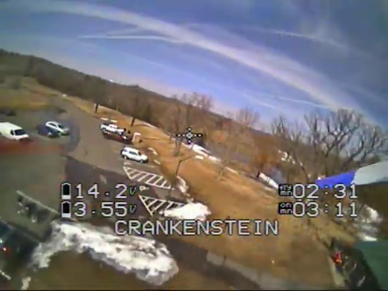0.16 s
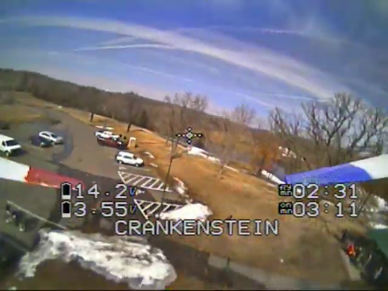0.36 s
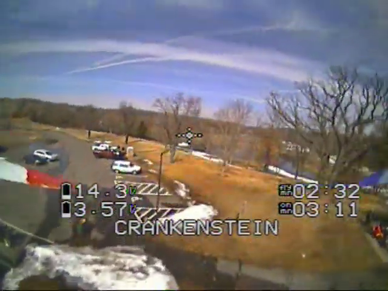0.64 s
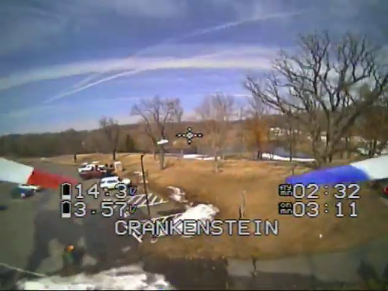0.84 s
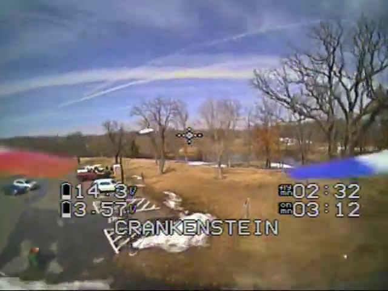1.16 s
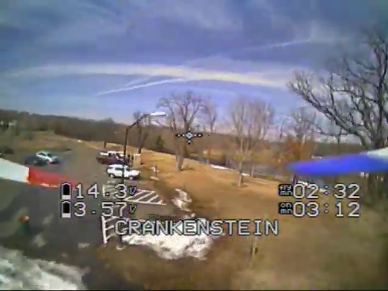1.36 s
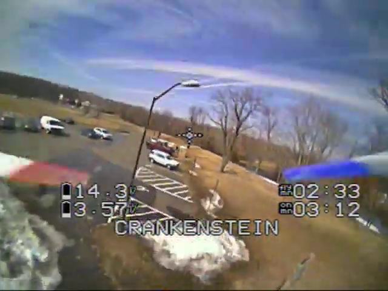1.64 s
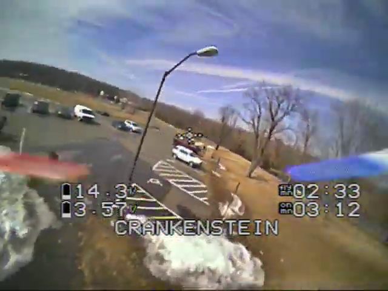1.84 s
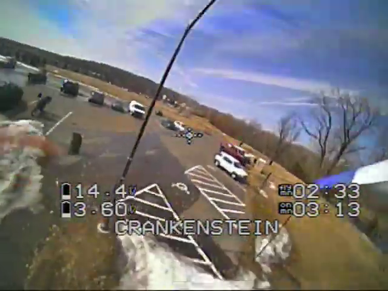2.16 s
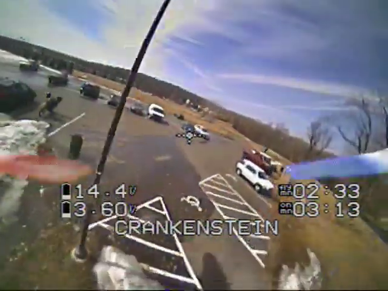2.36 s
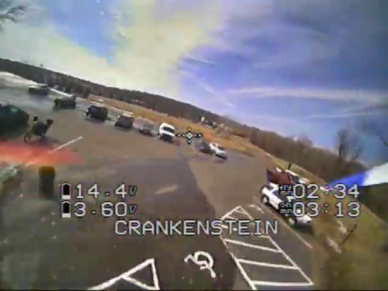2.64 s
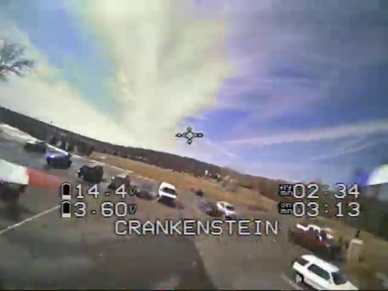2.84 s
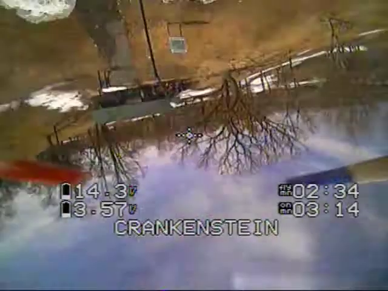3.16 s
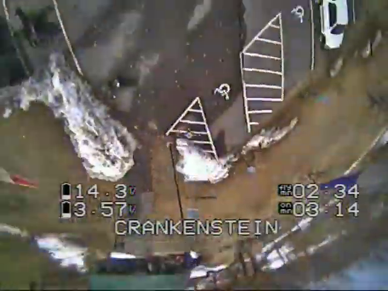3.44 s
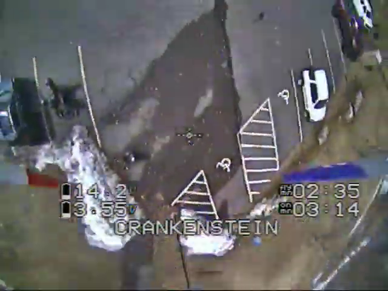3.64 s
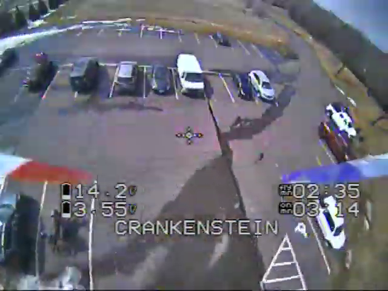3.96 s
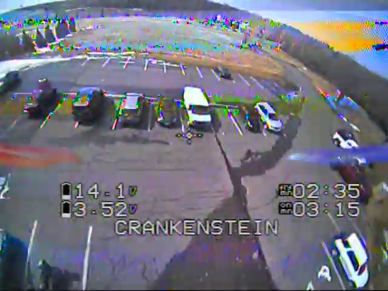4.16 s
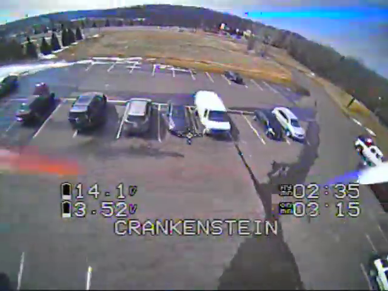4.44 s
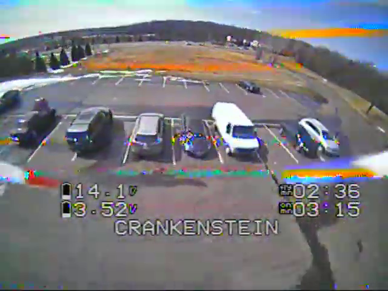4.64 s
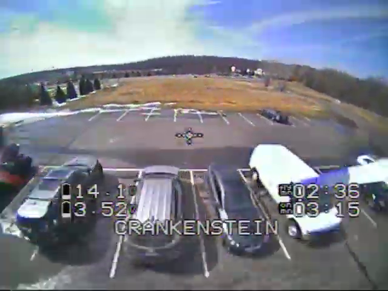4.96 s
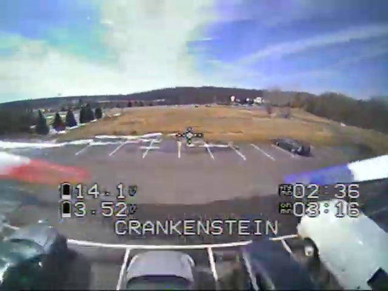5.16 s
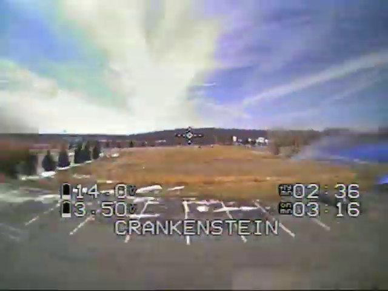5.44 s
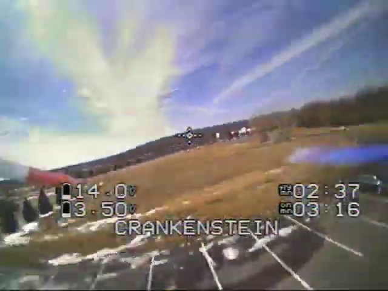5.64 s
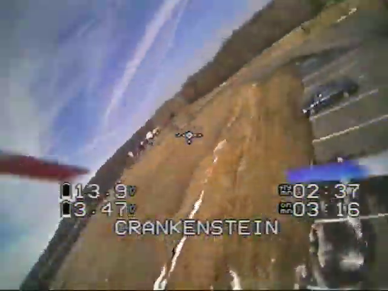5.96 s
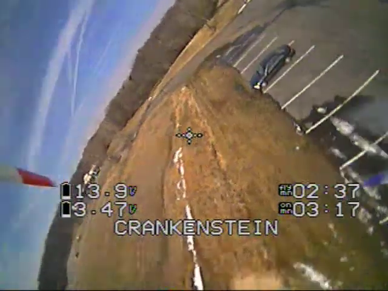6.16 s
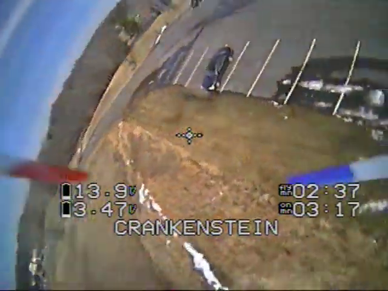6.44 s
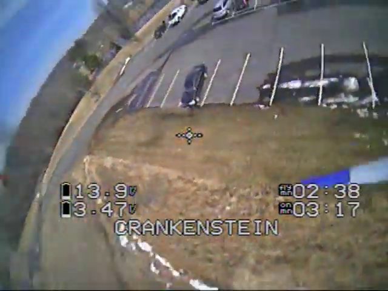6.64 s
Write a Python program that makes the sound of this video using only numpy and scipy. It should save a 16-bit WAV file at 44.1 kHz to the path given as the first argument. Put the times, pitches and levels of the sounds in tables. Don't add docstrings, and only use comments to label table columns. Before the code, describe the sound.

A harsh low video buzz runs under hiss and gusty thumps until a small drone dives in overloaded roar, then winds down to faint whines.

```python
import sys
import numpy as np
from scipy import signal
from scipy.fft import rfft, irfft, next_fast_len
from scipy.io import wavfile

SR = 44100
rng = np.random.default_rng(int(sys.argv[2]) if len(sys.argv) > 2 else 0)


def gain_from_db(level_db):
    decades = np.asarray(level_db, float) / 20
    return 10 ** decades


def inscribe(sig):
    pcm = np.round(np.clip(np.atleast_2d(sig).T, -1, 1) * 32767)
    wavfile.write(sys.argv[1], SR, pcm.astype(np.int16))


N = 300321

FIELD_HZ = 49.951
TEXT_TOP_MS, TEXT_PITCH_MS, TEXT_HEIGHT_MS, TEXT_END_MS = 2.82, 1.163, 0.9, 6.08
BLANK_START_MS, BLANK_END_MS = 9.63, 11.16
PATCH_START_MS, PATCH_END_MS, BAND_START_MS = 19.4, 0.33, 1.2

# time in seconds, ground below the text,
# foreground before blanking, sky after blanking, glare at the field edge (all full scale units).
VIEW_STEPS = [(0.0, .2, .1, .17, .3), (.27, .3, .14, .2, .33), (.65, .52, .11, .08, .1),
              (1.08, .3, .11, .19, .2), (1.62, .49, .16, .09, .1), (1.95, .35, .17, .13, .0),
              (2.43, .18, .24, .2, .14), (2.97, .07, .15, .15, .15), (3.24, .1, .07, .41, .04),
              (3.55, .23, .2, .41, .02), (4.15, .0, .45, .5, .0), (4.59, .36, .0, .13, .0),
              (4.86, .36, .14, .24, .2), (5.13, -.1, .2, .24, .14), (5.45, .08, .1, .13, .15),
              (6.15, .31, .21, .19, .02), (6.5, .14, .12, .28, .0), (6.81, .11, .06, .35, -.06)]
# time in seconds, share repeating from field to field (0-1),
# excess of the busy lower picture in dB.
PICTURE_TEXTURE = [(0, 0.5, 9.5), (1.4, 0.7, 10), (2.9, 0, 4.5), (3.2, 0.3, 5), (4, 0.2, 1.5), (5, 0.4, 2),
                   (6, 0.1, -1), (6.81, 0.8, -18.5)]
# start in seconds, end in seconds, multiple of the field rate, level in dB rms.
GROUND_STRIPES = [
    (0, .5, 14, -31.5),
    (.75, 1.198, 10, -30.5),
    (1.649, 1.9, 10, -34.5),
    (3.5, 3.802, 12, -32),
    (5.93, 6.215, 7, -25),
    (6.42, 7.095, 7, -21.5),
]
# time in seconds, pitch in Hz, level in dB rms.
ROTOR_TONES = [
    [(4.0, 172, -20), (4.04, 185.1, -14), (4.255, 212, -6.5), (4.39, 246.1, -6.5), (4.555, 393, -7),
     (4.69, 468, -12.5), (4.8, 491, -16), (4.91, 505, -20.5), (4.98, 505, -28.5)],
    [(4.98, 505, -28.5), (5.12, 355.6, -24.5), (5.26, 247.7, -31), (5.42, 234.4, -29)],
]
# time in seconds, pitch in Hz, level in dB rms.
MOTOR_WHINES = [
    [(4.362, 690, -14), (4.41, 1027, -22), (4.45, 1185, -21), (4.5, 1170, -25), (4.58, 1040, -27),
     (4.65, 1040, -23), (4.88, 1000, -33), (5.1, 880, -29), (5.25, 1048, -35)],
    [(5.95, 600, -36), (6.08, 585, -26), (6.19, 595, -28), (6.28, 660, -25), (6.55, 668, -28),
     (6.72, 690, -41)],
]
# start in seconds, length in seconds, start pitch in Hz,
# end pitch in Hz, peak level in dB rms.
MOTOR_BLIPS = [
    (3.07, .08, 1390, 1347, -25.5),
    (3.091, .06, 1190, 1222, -25.5),
    (3.09, .06, 710, 660, -22.5),
    (4.52, .11, 1472, 1405, -24),
    (5.269, .22, 1204, 1262, -26.5),
    (5.56, .14, 940, 880, -30),
    (4.56, .56, 118, 99.9, -16),
]
# time in seconds, airspeed as buffeting in dB, rotor load as wash in dB.
FLIGHT_PATH = [(0, -25, -26), (.55, -25, -23.5), (.85, -32.5, -27), (1.55, -23, -25), (1.9, -27.5, -28),
               (2.25, -24, -24), (2.5, -28, -28), (3.0, -29, -28.5), (3.3, -27, -22.5), (3.9, -21, -23.5),
               (4.0, -7, -18.5), (4.12, -10, -20), (4.3, -5, -18), (4.47, -6.5, -13.5), (4.77, -12, -16),
               (5.1, -24.5, -22), (6.4, -27.5, -22.5), (6.81, -27, -27.5)]
# time in seconds, peak in dB, pitch in Hz, width in ms.
GUST_KNOCKS = [(0.128, -14, 222, 5.9), (0.379, -15, 211, 8.2), (0.579, -6, 124, 9.4),
               (0.634, -14, 214.4, 6.4), (0.663, -15.5, 155.7, 3.9), (1.96, -14, 249.4, 6.3),
               (2.208, -15.5, 208.5, 8.3), (2.348, -17.5, 257.6, 13), (3.118, -9.5, 158, 4),
               (3.246, -8, 158, 10), (3.288, -18.5, 175, 9.0), (3.559, -14.5, 165.6, 17.9),
               (3.643, -7, 155.8, 7.4), (3.745, -7.5, 175.3, 9.8), (3.833, -12.5, 199, 9.7),
               (5.133, -9.5, 289, 18), (5.193, -11, 242, 8.7), (5.225, -12, 230.5, 3.1),
               (5.338, -13, 182, 8), (5.362, -11, 215.3, 4.5), (5.431, -9.5, 181.5, 6.3),
               (5.471, -8.5, 194, 4.1), (5.57, -7.5, 147, 10.8), (5.795, -6.5, 171, 7.4),
               (6.232, -17, 160.6, 14), (6.584, -13.5, 150.4, 9.1)]
# time in seconds, stall in ms, depth of the swing before,
# height of the rebound after (both full scale units).
INPUT_DROPOUTS = [(3.101, 9, 0.4, 0.14), (3.126, 2.2, 0.087, .62), (3.266, 2.4, 0.69, .4),
                  (4.893, 2, 0.37, 0.81), (3.937, 7, 0.23, 0.23), (4.009, 5, .4, .8), (4.016, 13, 0.56, 1),
                  (4.048, 4, 0.39, 0.92), (4.107, 5.1, 0.66, 0.51), (4.168, 5.9, 0.55, 0.99),
                  (4.175, 7, 1, 0.67), (4.222, 6.9, 0.49, .25), (4.358, 6.8, 0.68, .6),
                  (4.449, 2.6, .5, 0.61), (5.255, 3, 0.3, 0.076), (5.468, 1.7, 0.64, 0.48)]
# frequency in Hz, density in dB per Hz.
WIND_SPECTRUM = [(25, -13.5), (60, -9), (110, -3), (170, -3), (320, -9), (600, -28)]
# frequency in Hz, density in dB per Hz.
WASH_SPECTRUM = [(60, -5.5), (250, 3.5), (450, 1.5), (700, -0.5), (1000, -5), (1600, -13), (3000, -24.5)]
# frequency in Hz, density in dB per Hz.
HISS_SPECTRUM = [(600, -16.5), (1300, 4.5), (2000, -0.5), (2700, -3), (3400, -6), (4200, -2.5), (6000, -10)]


def rms_one(x):
    return x / np.sqrt(np.mean(x ** 2) + 1e-20)


def in_time(rows):
    s, *columns = np.transpose(rows)
    return [np.interp(np.arange(N) / SR, s, column) for column in columns]


def one_pole(x, ms):
    r = np.exp(-1000 / (ms * SR))
    return signal.lfilter([1 - r], [1, -r], x)


def drift(rate_hz):
    ms = 1000 / (2 * np.pi * rate_hz)
    noise = rng.standard_normal(N + SR)
    smooth = one_pole(one_pole(noise, ms), ms)
    return rms_one(smooth[SR:])


def colour(x, spectrum):
    hz, db = np.transpose(spectrum)
    size = next_fast_len(N, real=True)
    log_hz = np.log(np.arange(size // 2 + 1) * SR / size + 1)
    gain = gain_from_db(np.interp(log_hz, np.log(hz), db, left=-60, right=-60))
    return rms_one(irfft(rfft(x, size) * gain, size)[:N])


def scan_clock(fields):
    turns = np.arange(N) / SR * FIELD_HZ / fields
    return turns.astype(int), turns % 1 * fields * 1000 / FIELD_HZ


def scan_steps():
    below, blank_in, blank_out, glare = in_time(VIEW_STEPS)
    squeeze_s, squeeze_width_s, squeeze_depth = 4.5, 0.35, 0.8
    away = (np.arange(N) / SR - squeeze_s) / squeeze_width_s
    squeeze = 1 - squeeze_depth * np.exp(-away ** 2)
    text = (0.68 - 0.5 * below - 0.45 * blank_out) * squeeze
    return text, below, blank_in, blank_out, 1.2 * glare, 0.75 * glare


def scan_buzz():
    field, ms = scan_clock(1)
    text, below, blank_in, blank_out, patch, band = scan_steps()
    chance = rng.standard_normal((field[-1] + 1, 5))[field].T

    def edge(at_ms):
        passed = ms >= at_ms
        return 1. * (np.diff(passed, prepend=False) & passed)

    steps = np.zeros(N)
    for row in range(3):
        top_ms = TEXT_TOP_MS + TEXT_PITCH_MS * row
        pulse = edge(top_ms + TEXT_HEIGHT_MS) - edge(top_ms)
        steps += pulse * text * (1 + 0.16 * chance[row])
    steps += edge(TEXT_END_MS) * below * (1 + 0.2 * chance[3])
    steps += edge(BLANK_START_MS) * blank_in
    steps -= edge(BLANK_END_MS) * blank_out * (1 + 0.25 * chance[4])
    steps += (edge(PATCH_END_MS) - edge(PATCH_START_MS)) * patch
    steps += (edge(TEXT_TOP_MS) - edge(BAND_START_MS)) * band
    steps[0] -= 0.4
    sag_s = 1.48e-3
    sag = signal.lfilter([1], [1, -np.exp(-1 / (SR * sag_s))], steps)
    return one_pole(one_pole(sag, ms=0.15), ms=0.15)


def stripes():
    t = np.arange(N) / SR
    out = np.zeros(N)
    for start_s, end_s, multiple, level_db in GROUND_STRIPES:
        progress = np.clip((t - start_s) / (end_s - start_s), 0, 1)
        swell = np.sin(np.pi * progress) ** 0.86
        carrier = np.sin(2 * np.pi * round(multiple) * FIELD_HZ * t)
        out += np.sqrt(2) * gain_from_db(level_db) * swell * carrier
    return out


def tone(rows, wobble, flutter_db, overtone_db):
    hz, level_db = in_time(rows)
    t = np.arange(N) / SR
    turn = 2 * np.pi * np.cumsum(hz * (1 + wobble * drift(30))) / SR
    running = (t > rows[0][0]) * (t < rows[-1][0])
    gain = np.sqrt(2) * gain_from_db(level_db + flutter_db * drift(45)) * running
    return gain * (np.sin(turn) + gain_from_db(overtone_db) * np.sin(2 * turn))


def beating():
    together_s, lasts_s = 4.04, 0.75
    beat_hz, slowing_hz_per_s, weaker_share = 14.64, 11.6, 0.75
    t = np.clip(np.arange(N) / SR - together_s, -lasts_s, lasts_s)
    share = weaker_share * (1 - np.abs(t) / lasts_s)
    turn = 2 * np.pi * (beat_hz * t - slowing_hz_per_s * t ** 2 / 2)
    return np.abs(1 + share * np.exp(1j * turn)) / (1 + share)


def blip(start_s, length_s, from_hz, to_hz, peak_db):
    attack, rise_db, fade_db = 0.3, 16, 13
    return [(start_s, from_hz, peak_db - rise_db),
            (start_s + attack * length_s, from_hz + attack * (to_hz - from_hz), peak_db),
            (start_s + length_s, to_hz, peak_db - fade_db)]


def motors():
    shake = sum(tone(rows, wobble=0.022, flutter_db=2.4, overtone_db=-17) for rows in ROTOR_TONES)
    whine_rows = MOTOR_WHINES + [blip(*row) for row in MOTOR_BLIPS]
    whines = sum(tone(rows, wobble=0.007, flutter_db=1.8, overtone_db=-25) for rows in whine_rows)
    return beating() * shake + whines


def knocks():
    out = np.zeros(N)
    t = np.arange(-2000, 2000) / SR
    for s, peak_db, hz, width_ms in GUST_KNOCKS:
        swing = np.sin(2 * np.pi * hz * t) * np.exp(-(t * 1700 / width_ms) ** 2)
        middle = round(s * SR)
        out[middle - 2000:middle + 2000] += gain_from_db(peak_db - 2.0) * swing
    return out


def gusts_db():
    swell_db, swell_s = 7.0, 0.07
    s = np.arange(0, N, 64) / SR
    nearest_s = np.abs(s[:, None] - np.transpose(GUST_KNOCKS)[0]).min(axis=1)
    return np.interp(np.arange(N) / SR, s, swell_db * np.exp(-(nearest_s / swell_s) ** 2))


def busy_part(depth_db):
    turn = 2 * np.pi * (scan_clock(1)[1] - 2) * FIELD_HZ / 1000
    return gain_from_db(depth_db / 2 * np.tanh(2 * np.cos(turn)))


def wind(level_db):
    depth_db = in_time(PICTURE_TEXTURE)[1]
    lumps = gain_from_db(level_db - 6.5 + 3.4 * drift(7.2))
    return lumps * busy_part(0.48 * depth_db) * colour(rng.standard_normal(N), WIND_SPECTRUM)


def picture_and_wash(level_db):
    field, ms = scan_clock(1)
    still, depth_db = in_time(PICTURE_TEXTURE)
    keep = 0.9
    fresh = rng.standard_normal((field[-1] + 31, 884))
    rows = signal.lfilter([np.sqrt(1 - keep ** 2)], [1, -keep], fresh, axis=0)
    pattern = rows[field + 30, (ms * SR / 1000).astype(int)]
    still = np.clip(still, 0, 1)
    mix = np.sqrt(still) * pattern + np.sqrt(1 - still) * rng.standard_normal(N)
    return gain_from_db(level_db + 1.6 * drift(38)) * busy_part(depth_db) * colour(mix, WASH_SPECTRUM)


def link_hiss(level_db):
    group, ms = scan_clock(2)
    strengths = gain_from_db(7.5 + 2.3 * rng.standard_normal(group[-1] + 2))
    strength = strengths[group + (ms > 20)]
    packet = one_pole(strength * ((ms > 37.3) | (ms < 1.4)), ms=0.3)
    high_pass = signal.butter(2, 2000, "high", fs=SR, output="sos")
    bright = signal.sosfilt(high_pass, rng.standard_normal(N))
    texture = busy_part(0.25 * in_time(PICTURE_TEXTURE)[1]) * gain_from_db(1.5 * drift(120))
    ground = texture * colour(rng.standard_normal(N), HISS_SPECTRUM)
    return gain_from_db(level_db - 2.5) * (ground + 0.85 * packet * colour(bright, HISS_SPECTRUM))


def scene():
    speed_db, wash_db = in_time(FLIGHT_PATH)
    calm_db, calm_hiss_db, hiss_follows = -28, -33, 0.22
    hiss_db = calm_hiss_db + hiss_follows * (speed_db - calm_db)
    air = knocks() + wind(speed_db + gusts_db()) + picture_and_wash(wash_db) + link_hiss(hiss_db)
    return (scan_buzz() + stripes() + motors() + air)[None]


def roll_off(x):
    return signal.sosfilt(signal.butter(12, 15850, fs=SR, output="sos"), x)


def record(dry):
    x = dry[0] / (1 + (dry[0] / 0.9) ** 4) ** 0.25
    ms = np.arange(N) * 1000 / SR
    for s, stall_ms, depth, rebound in INPUT_DROPOUTS:
        span = slice(round(s * SR) - 100, round(s * SR) + 1200)
        t = ms[span] - s * 1000
        after = t - stall_ms - 1.2
        stalled = np.clip(np.minimum(t + 1.6, stall_ms - t) / 0.8, 0, 0.86)
        swing = -depth * np.exp(-np.abs(t) / 1.3) * stalled
        swing += rebound * np.exp(-(after / 0.9) ** 2)
        duck = 1 - 0.2 * np.exp(-(after / 0.5) ** 2)
        x[span] = x[span] * (1 - stalled) * duck + swing
    x = signal.sosfiltfilt(signal.cheby2(7, 36, 4750, fs=SR, output="sos"), x)
    x = np.clip(x - x.mean() - 0.0076, -0.708, 0.708)
    return roll_off(x[None])


dry = scene()
out = record(dry)
inscribe(out)
```